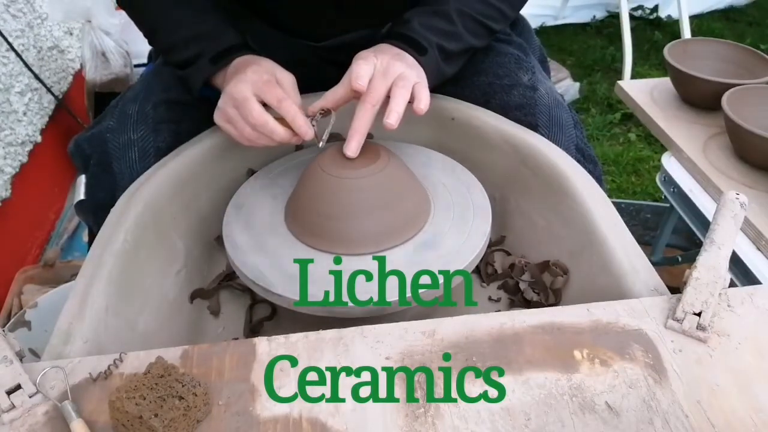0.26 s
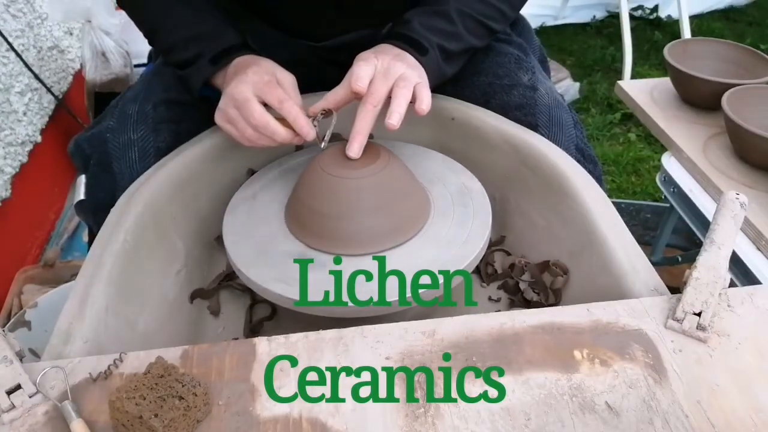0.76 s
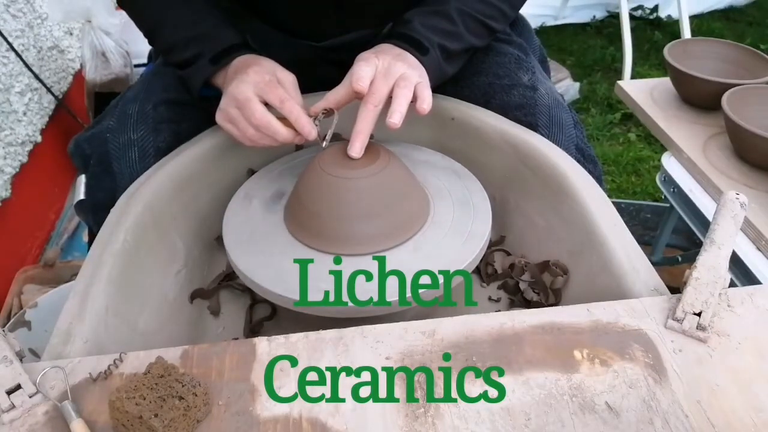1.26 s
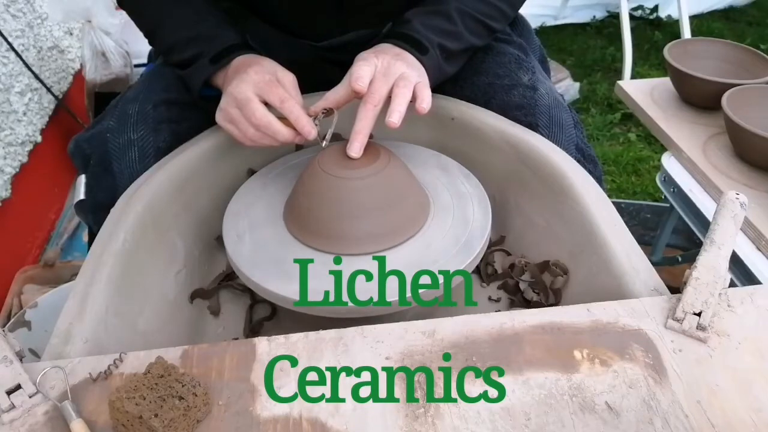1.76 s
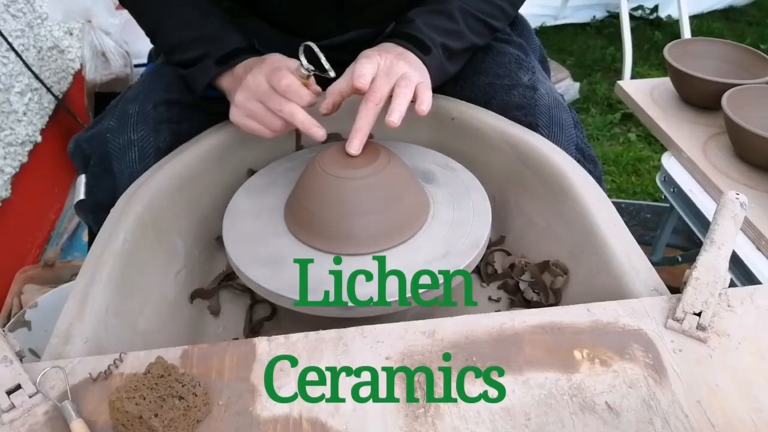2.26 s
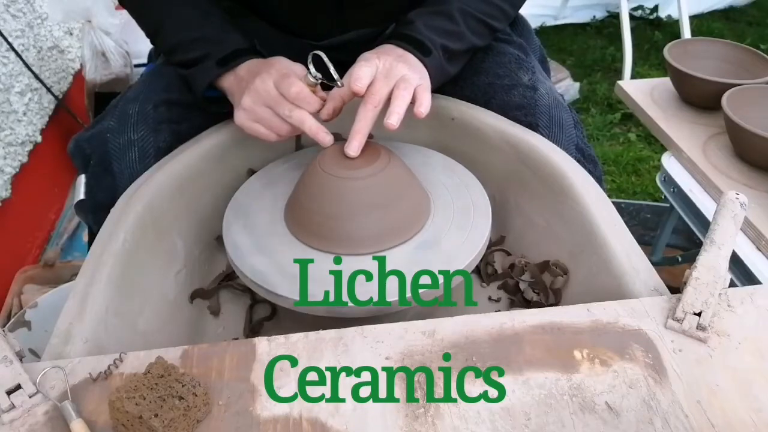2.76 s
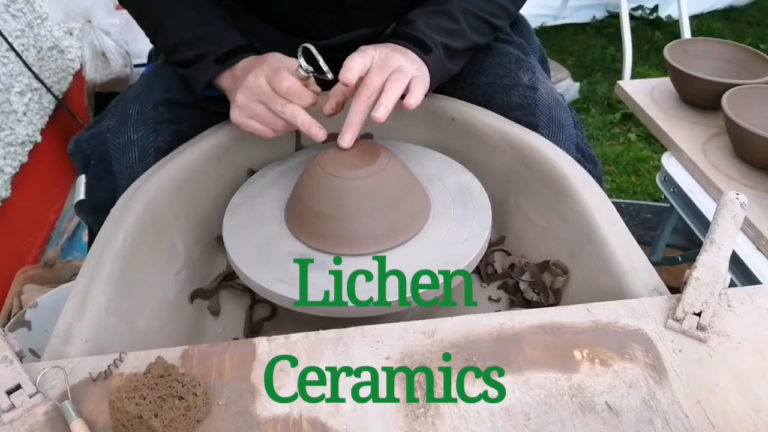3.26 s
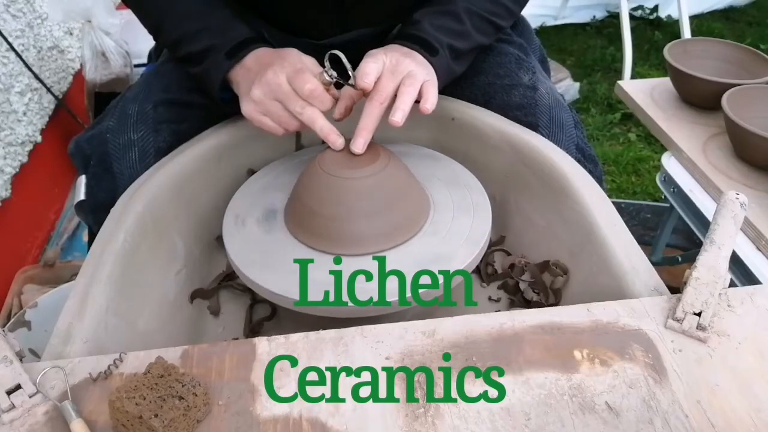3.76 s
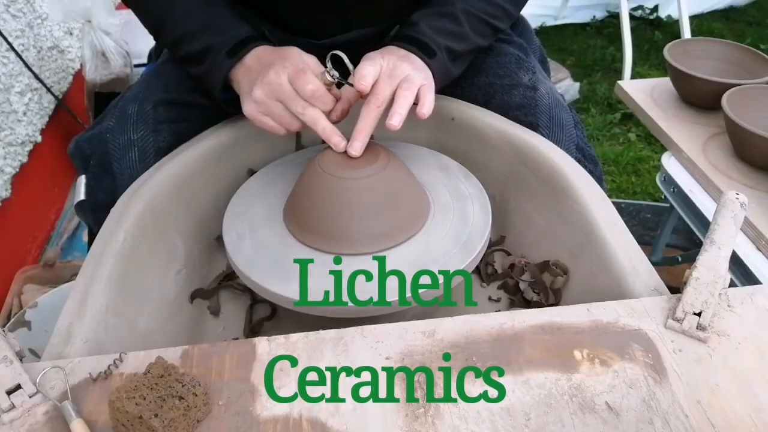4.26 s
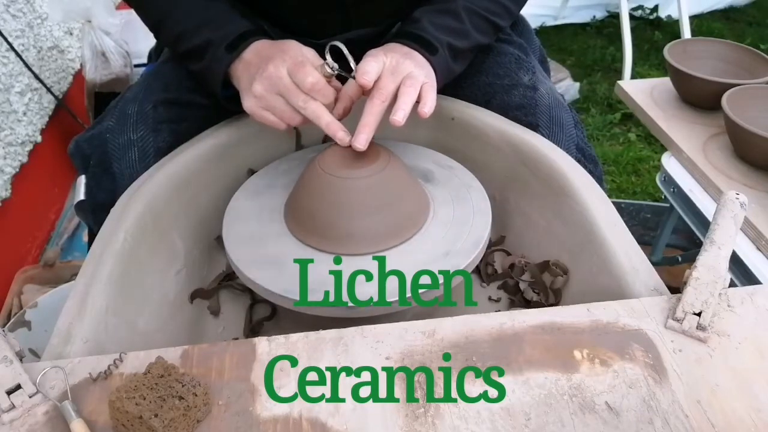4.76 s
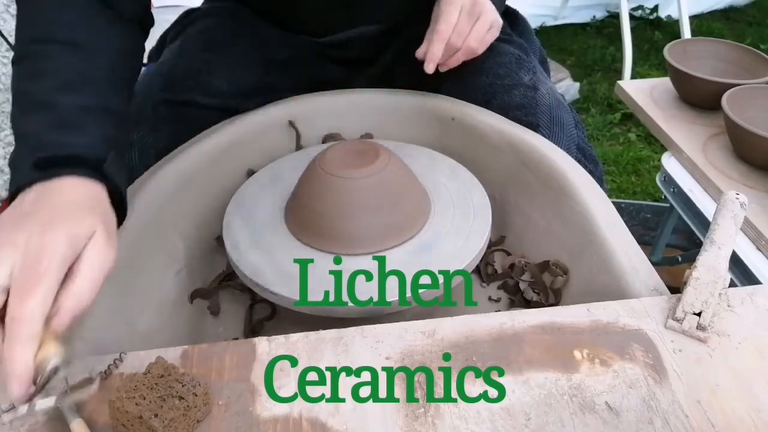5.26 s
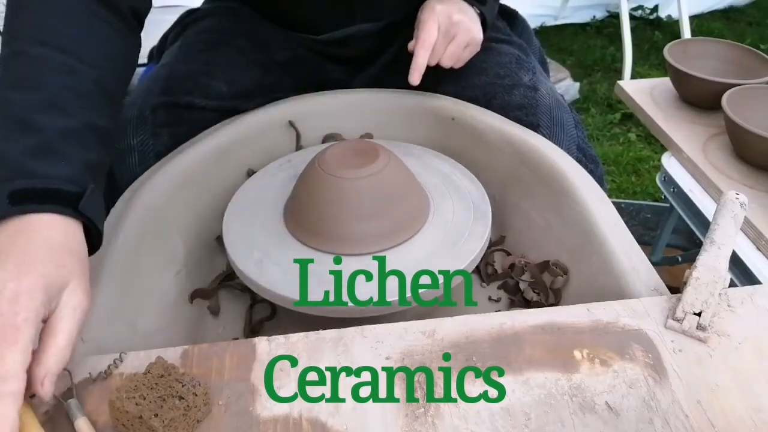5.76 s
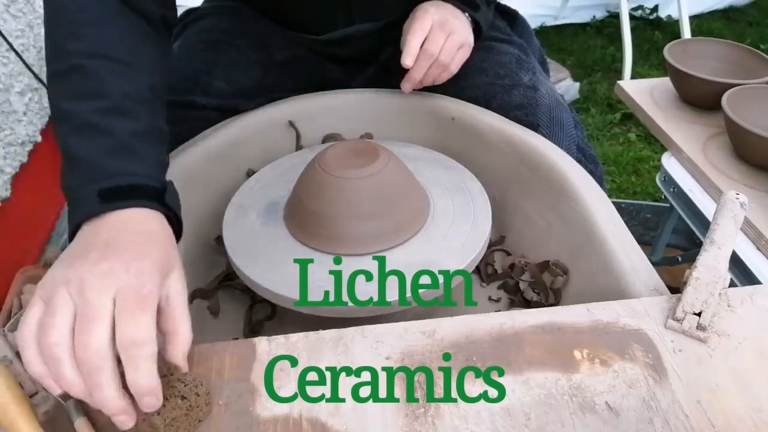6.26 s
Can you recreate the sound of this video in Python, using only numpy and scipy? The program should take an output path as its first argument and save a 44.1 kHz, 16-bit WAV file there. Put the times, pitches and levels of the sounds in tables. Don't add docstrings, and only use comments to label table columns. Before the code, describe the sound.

An electric pottery wheel drones with a low, fast-pulsing hum while a distant bird twitters, then it slows, stops, and tools knock on wood.

```python
import sys
import numpy as np
from scipy import signal
from scipy.fft import rfft, irfft, next_fast_len
from scipy.io import wavfile
from scipy.ndimage import uniform_filter1d, map_coordinates

SR = 44100
rng = np.random.default_rng(int(sys.argv[2]) if len(sys.argv) > 2 else 0)


def dump(signal):
    limited = np.clip(np.atleast_2d(signal).T, -1, 1)
    pcm = np.round(limited * 32767).astype(np.int16)
    wavfile.write(sys.argv[1], SR, pcm)


def volts_from_db(level):
    exponent = np.asarray(level, float) / 20
    return 10 ** exponent


N = 287091
T = np.arange(N) / SR
PRESS_S, PRESS_WIDE_S, PRESS_DB = 1.69, 0.13, 2


def along(points, hz):
    f, v = np.transpose(points)
    return np.interp(np.log(hz + 1), np.log(f + 1), v)


def curves(rows):
    s, *cols = np.transpose(rows)
    return [np.interp(T, s, c) for c in cols]


def wobble(rate):
    return map_coordinates(rng.standard_normal(int(N * rate / SR) + 4), [T * rate])


def bump(s, wide):
    return np.exp(-((T - s) / wide) ** 2)


def filtered(x, response):
    m = next_fast_len(N + SR)
    return irfft(rfft(x, m) * response(np.fft.rfftfreq(m, 1 / SR)), m)[..., :N]


def sides(db):
    return volts_from_db([[db / 2], [-db / 2]])


# (frequency [Hz], likeness [0-1])
EAR_LIKENESS = [(30, 0.57), (150, 1), (500, 0.55), (1000, 0.067), (4000, 0.054)]


def rush(spectrum, lo_hz, hi_hz, patchy_db):
    z = signal.stft(rng.standard_normal((2, N)), nperseg=512)[2]
    patches = uniform_filter1d(rng.standard_normal(z.shape[1:]), 6, 0)
    patches = uniform_filter1d(patches, 10, 1)
    pair = signal.istft(z * volts_from_db(patchy_db * patches / patches.std()), nperseg=512)[1][:, :N]

    def mid_side(hz):
        turn = np.arccos(np.clip(along(EAR_LIKENESS, hz), -1, 1)) / 2
        return volts_from_db(along(spectrum, hz)) * [np.cos(turn), np.sin(turn)]

    mid, side = filtered(pair, mid_side)
    in_band = filtered(mid, lambda hz: (hz > lo_hz) & (hz < hi_hz))
    return np.array([mid + side, mid - side]) / in_band.std()


# (frequency [Hz], fade time [s])
ECHO_FADE = [(2000, 0.11), (3300, 0.64), (4500, 0.38), (6000, 0.39), (10000, 0.31), (15000, 0.17)]


def echoes(x):
    hz, t, z = signal.stft(rng.standard_normal((2, SR)), SR, nperseg=256)
    fade = volts_from_db(-60 * t / along(ECHO_FADE, hz)[:, None])
    tail = signal.istft(z * fade, SR, nperseg=256)[1]
    return signal.fftconvolve(x[None], tail / np.linalg.norm(tail[0]), axes=1)[:, :N]


def lumps(pattern, turns, hz, scatter_db):
    push = np.zeros(N)
    for place, db in pattern:
        passing = np.flatnonzero(np.diff(np.floor(turns - place)))
        scatter = scatter_db * rng.standard_normal(len(passing))
        push[passing] += volts_from_db(db + scatter) * SR / (2 * hz)
    return push


BELT_HZ, SHAFT_HZ = 5.3829, 24.8967
COAST_S = 5.3
WHIRR_DB = -56
# (place in the turn [0-1], force [dB])
BELT_LUMPS = [(.13, -46.1), (.211, -44.9), (.265, -53.3), (.333, -50.6), (.597, -56), (.633, -49.1),
              (.689, -49.5)]
# (place in the turn [0-1], force [dB])
SHAFT_LUMPS = [(.454, -43.7), (.852, -42.9)]
# (frequency [Hz], width [Hz], level [dB])
FRAME_MODES = [(138.6, 6, -19), (150.1, 6, 2.3), (158.8, 16, -9.2), (201.2, 10, -15.5), (237, 6, -15),
               (64, 3.6, -28.5), (107.3, 31, -30), (267, 4.7, -48.5), (300.4, 18, -30.5),
                    (422.6, 13.4, -30.5)]
# (time [s], speed [0-1], force [dB])
SLOWING = [
    (5.501, 0.98, 3.5),
    (5.702, 0.93, -13.5),
    (5.9, 0.62, -7.5),
    (6.05, 0.7, -3.5),
    (6.159, 0, -37),
    (6.51, 0, -20),
]
# (frequency [Hz], level [dB per Hz])
BEARING_COLOUR = [(20, -38), (45, -27), (65, -1), (150, 12.5), (230, 5.5), (340, -5), (420, 1.5), (470, -5),
                  (530, 5.5), (700, -4.5), (830, -7.5), (1000, -6), (1200, -17), (2200, -97)]


def wheel():
    speed, force_db = curves([(COAST_S, 1, 0)] + SLOWING)
    clock = np.cumsum(speed) / SR
    push = lumps(BELT_LUMPS, clock * BELT_HZ, BELT_HZ, scatter_db=0.7)
    push += lumps(SHAFT_LUMPS, clock * SHAFT_HZ, SHAFT_HZ, scatter_db=0.7)

    def ring(f):
        total = 0
        for k, (centre, width, db) in enumerate(FRAME_MODES):
            drag = 1j * f * width
            total = total + (-1) ** k * volts_from_db(db) * drag / (centre * centre - f * f + drag)
        return total * (f < 480)

    drone = filtered(push * volts_from_db(force_db - 0.93), ring) * sides(3.56)

    knead_db = 0.75 * speed * np.cos(4 * np.pi * (clock * BELT_HZ - 0.2)) + 0.5 * wobble(3.82)
    whirr = rush(BEARING_COLOUR, lo_hz=330, hi_hz=1200, patchy_db=1.18)
    resting = filtered(whirr, lambda f: 1 - 0.9 * (f < 280))
    whirr = resting + volts_from_db(force_db) * (whirr - resting)
    press_db = PRESS_DB * bump(PRESS_S, PRESS_WIDE_S)
    return drone + volts_from_db(WHIRR_DB + press_db + knead_db - 0.74) * whirr * sides(1.2)


MAINS_HZ = 99.95
MAINS_DB, MAINS_STALLED_DB = -60.5, -55.5
PEDAL_S, PEDAL_DB = 5.9, -10
# (multiple of MAINS_HZ, running [dB], stalled [dB], left over right [dB])
WINDING_BUZZ = [(2, -107.5, -77, -22), (3, -65, -64, 3), (4, -71, -79, -3.5), (5, -76, -65.5, -6),
                (6, -76, -71, 1), (7, -72.5, -70.5, -11.5), (8, -83, -72, 14), (9, -79.5, -69, 7),
                (10, -74, -76.5, 10.5)]
# (frequency [Hz], running [dB], stalled [dB])
SLOT_WHINE = [(1021, -76, -69), (1095.5, -76, -77), (996, -77, -72), (524, -70, -72)]


def motor():
    stall = np.interp(T, [5.95, 6.15], [0, 1])

    def tone(hz, running_db, stalled_db, dip_db=0):
        db = running_db + (stalled_db - running_db) * stall + dip_db
        return np.sqrt(2) * volts_from_db(db + 1.9 * wobble(6)) * np.sin(2 * np.pi * (hz * T + rng.random()))

    hum = tone(MAINS_HZ, MAINS_DB, MAINS_STALLED_DB, PEDAL_DB * bump(PEDAL_S, 0.17))
    buzz = sum(tone(k * MAINS_HZ, run, rest) * sides(pan) for k, run, rest, pan in WINDING_BUZZ)
    whine = sum(tone(hz, run, rest) for hz, run, rest in SLOT_WHINE)
    return hum * sides(7.4) + buzz + whine * sides(6.8)


BOARD_UPPER, BOARD_CYCLES = 1.8, 34.4
TINK_T60_S, RATTLE_DB = 0.065, -5.5
# (time [s], peak level [dB], pitch of the spot [Hz], hardness [dB])
BOARD_THUMPS = [(5.453, -26, 208, -5.5), (5.479, -38.5, 307, 0.5), (5.514, -30, 233.5, -13),
                (5.609, -37, 193, -18), (5.843, -33, 247, -8), (5.875, -36.5, 160.6, -7),
                (6.346, -33, 233.6, -13), (6.35, -41, 150, -23), (5.56, -53, 53.6, -15),
                (5.875, -52, 63.3, -12)]
# (frequency [Hz], level [dB], fade time [s])
HANDLE_MODES = [(606, -2.5, 0.064), (677, 1, 0.053), (797, -3.5, 0.048), (1490, -19, 0.035)]
# (time [s], peak level [dB], left over right [dB])
HANDLE_TAPS = [
    (5.612, -45, 4),
    (5.739, -37, 9),
    (5.838, -31, 10.5),
    (5.848, -33, 12),
]
# (time [s], peak level [dB], pitch [Hz])
LOOP_TINKS = [
    (5.325, -44.5, 1606),
    (5.462, -48.5, 1023),
    (5.739, -51, 1550),
]
# (frequency [Hz], level [dB per Hz])
RATTLE_COLOUR = [(400, -17), (1000, 4), (1550, -10), (1900, -1.5), (2700, 0.5), (3200, -4.5), (3700, -15.5),
                 (7000, -13), (9000, -28), (15000, -22)]


def board():
    wood, loose = np.zeros((2, N + SR)), np.zeros((2, N + SR))
    t = T[:SR // 3]
    rings, rattles = [], []
    for s, db, hz, hard in BOARD_THUMPS:
        for k in range(2):
            pitch = hz * BOARD_UPPER ** k
            rings.append((s, db + k * hard, pitch, BOARD_CYCLES / pitch, 1.5))
        rattles.append((s, db + hard - 6))
    for s, db, pan in HANDLE_TAPS:
        rings += [(s, db + level, hz, t60, pan) for hz, level, t60 in HANDLE_MODES]
        rattles.append((s, db - 0.5 + 0.4 * (db + 32)))
    for s, db, hz in LOOP_TINKS:
        rings.append((s, db, hz, TINK_T60_S, 0))
        rattles.append((s, db + 3))

    for s, db, hz, t60, pan in rings:
        phase = 2 * np.pi * rng.random((2, 1))
        neighbours = np.sin(2 * np.pi * hz * np.array([[0.84], [1.19]]) * t + phase).sum(0)
        ring = np.sin(2 * np.pi * hz * t) + min(0.3, 200 / hz) * neighbours
        onset = 1 - np.exp(-t * hz * (0.45 + hz / 600))
        wood[:, round(s * SR):][:, :len(t)] += volts_from_db(db - 60 * t / t60) * ring * onset * sides(pan)

    fading = volts_from_db(-60 * t / 0.0033) + 1.05 * volts_from_db(-60 * t / 0.23)
    for s, db in rattles:
        noise = rng.standard_normal((2, len(t)))
        loose[:, round(s * SR):][:, :len(t)] += volts_from_db(db + RATTLE_DB) * fading * noise * sides(3.9)
    hits = wood[:, :N] + filtered(loose[:, :N], lambda hz: volts_from_db(along(RATTLE_COLOUR, hz)))
    return hits + volts_from_db(-7) * echoes(hits.mean(0))


SLEEVE_RISE, SLEEVE_FALL, SLEEVE_REST_DB = 135, 55, -94.5
# (time [s], hold [s], level [dB])
SLEEVE_MOVES = [
    (0, 0.17, -82.5),
    (2.303, .02, -92),
    (3.6, 0.37, -80),
    (5.2, 0.057, -76),
    (5.3, .2, -67),
    (6.003, 0.19, -83.5),
]
# (time [s], peak level [dB])
CRUMBS = [(0.5302, -71), (1.1697, -71), (1.3698, -75), (1.5094, -71), (2.1094, -66), (2.1544, -77),
          (2.3106, -67), (2.6294, -70), (2.7601, -75), (2.8394, -67), (3.3994, -66)]
# (frequency [Hz], level [dB per Hz])
CLOTH_COLOUR = [(1200, -21), (2000, -8.5), (3300, -14), (4400, -9.5), (6800, 1), (8050, -8), (11600, -15.5),
                (15100, -9.5), (16000, -29)]


def potter():
    rustle = volts_from_db(SLEEVE_REST_DB)
    for s, hold, db in SLEEVE_MOVES:
        before, after = np.maximum(s - T, 0), np.maximum(T - s - hold, 0)
        rustle = rustle + volts_from_db(db - SLEEVE_RISE * before - SLEEVE_FALL * after)
    rustle = rustle * volts_from_db(0.63 * wobble(40))
    for s, db in CRUMBS:
        rustle[round(s * SR):][:1500] += volts_from_db(db - 11 - 60 * T[:1500] / 0.1)
    return rustle * rush(CLOTH_COLOUR, lo_hz=10100, hi_hz=14150, patchy_db=1.3) * sides(2.4)


WARBLE_HZ = 188.9


def whistle(s, length, hz0, hz1, db, warble_hz, rise):
    t = T[:int(length * SR)]
    uneven = wobble(WARBLE_HZ)[:len(t)]
    quaver = 1.04 * np.sin(2 * np.pi * WARBLE_HZ * t + 1.11 * uneven) + 0.593 * uneven
    pitch = hz0 + (hz1 - hz0) * t / length + warble_hz * quaver
    edges = np.minimum(1, np.minimum(t / rise, (length - t) / (rise / 4)))
    shape = edges * volts_from_db(warble_hz / 90 * uneven[::-1])
    out = np.zeros(N)
    out[round(s * SR):][:len(t)] = volts_from_db(db) * shape * np.sin(2 * np.pi * np.cumsum(pitch) / SR)
    return out


SAG_HZ_PER_S, SLUR_HZ_PER_S, BUZZ_HZ_PER_S, PIP_HZ = 1190, 8700, 660, 3920
HELD_WARBLE_HZ, SLUR_WARBLE_HZ, BUZZ_WARBLE_HZ, PIP_WARBLE_HZ = 71, 151, 223, 51
DIVE_S, DIVE_TO_HZ, ROLL_WARBLE_HZ = 0.046, 2960, 110
CLIMB_S, CLIMB_FROM_HZ, CLIMB_TO_HZ, CLIMB_DB = 0.105, 3130, 3380, -1.5
# (time [s], length [s], pitch [Hz], level [dB])
HELD_NOTES = [(3.055, 0.025, 7250, -71), (3.111, 0.065, 7110, -61.5), (3.34, 0.082, 5230, -72),
              (3.422, 0.05, 5790, -63.5), (3.49, 0.04, 6860, -49), (3.546, 0.064, 5640, -58.5),
              (3.628, 0.088, 4800, -64), (3.735, 0.024, 3890, -56.5), (3.822, .065, 2930, -62),
              (3.829, 0.14, 9920, -76), (3.909, 0.087, 3233, -53.5), (4.005, 0.12, 2690, -67.5),
              (4.264, 0.026, 5120, -72), (4.983, 0.098, 4020, -70)]
# (time [s], length [s], pitch [Hz], level [dB])
QUICK_SLURS = [(3.215, .045, 6840, -61.5), (3.238, 0.05, 6270, -68), (3.462, .033, 7250, -56),
               (3.601, 0.27, 6350, -68), (3.648, 0.054, 5540, -63.5), (3.703, 0.047, 4120, -60),
               (3.795, 0.022, 3180, -56), (4.039, 0.019, 7350, -66)]
# (time [s], length [s], pitch [Hz], level [dB])
HIGH_BUZZES = [
    (4.345, 0.144, 7490, -60.5),
    (4.511, 0.089, 7660, -56),
    (4.69, 0.12, 7610, -56),
]
# (time [s], length [s], level [dB])
CLOSING_PIPS = [
    (4.845, 0.085, -68),
    (5.06, 0.016, -56.5),
    (5.103, .02, -63),
    (5.15, 0.13, -74),
    (5.27, 0.046, -71),
]
# (time [s], pitch dived from [Hz], level [dB])
CLOSING_ROLLS = [
    (4.869, 3590, -59),
    (5.066, 3380, -58),
    (5.25, 3270, -68),
]


def song():
    pips = [(s, length, PIP_HZ, db) for s, length, db in CLOSING_PIPS]
    kinds = [(HELD_NOTES, SAG_HZ_PER_S, HELD_WARBLE_HZ), (QUICK_SLURS, SLUR_HZ_PER_S, SLUR_WARBLE_HZ),
             (HIGH_BUZZES, BUZZ_HZ_PER_S, BUZZ_WARBLE_HZ), (pips, SAG_HZ_PER_S, PIP_WARBLE_HZ)]
    notes = []
    for rows, fall, warble in kinds:
        notes += [(s, length, hz, hz - fall * length, db, warble) for s, length, hz, db in rows]
    for s, hz, db in CLOSING_ROLLS:
        notes.append((s, DIVE_S, hz, DIVE_TO_HZ, db, ROLL_WARBLE_HZ))
        climb_s = s + DIVE_S + 0.008
        notes.append((climb_s, CLIMB_S, CLIMB_FROM_HZ, CLIMB_TO_HZ, db + CLIMB_DB, ROLL_WARBLE_HZ))
    return sum(whistle(*note, rise=0.0023) for note in notes)


# (frequency [Hz], left over right [dB])
SINGER_SIDE = [(3000, 3), (5600, 4.5), (6900, 7), (7500, -3), (10000, -14)]


def songbird():
    direct = song()
    near = echoes(direct)
    late = echoes(near.mean(0))
    heard = volts_from_db(-0.5) * direct + volts_from_db(7.5) * near + volts_from_db(-0.5) * late
    return filtered(heard, lambda hz: volts_from_db([along(SINGER_SIDE, hz) / 2, -along(SINGER_SIDE, hz) / 2]))


# (time [s], length [s], start pitch [Hz], end pitch [Hz], level [dB])
CHIRP = (6.3437, .0052, 5450, 5850, -20.3)
# (frequency [Hz], level [dB per Hz])
SNAP_COLOUR = [(1500, -16), (2300, -19), (2640, -2), (2900, -14), (3600, -17), (4200, -21), (5000, -1),
               (5900, 0.5), (7300, -6), (10300, -19.5), (12000, -35), (14500, -14), (16000, -27)]


def chip():
    chirp = whistle(*CHIRP, 0, rise=0.0032)
    snap = np.zeros(N)
    snap[round((CHIRP[0] + 0.002) * SR)] = volts_from_db(8.0)
    snap = filtered(snap, lambda hz: volts_from_db(along(SNAP_COLOUR, hz))) * (T > CHIRP[0])
    direct = chirp * sides(10.5) + volts_from_db(-14) * snap * sides(2.2)
    return direct + echoes(volts_from_db(-10) * chirp + snap) * sides(2.2)


# (frequency [Hz], level [dB per Hz])
AIR_COLOUR = [(700, -21), (1000, -12.5), (1200, -10), (1350, -4), (1620, -11), (2020, -7), (2430, -12),
              (3240, -14.5), (4270, -20.5), (5500, -15), (7300, -13.5), (8900, -28.5), (12500, -30.5),
              (14800, -28)]
# (frequency [Hz], level [dB per Hz])
RUMBLE_COLOUR = [(15, -9), (25, 2.5), (40, -19), (60, 1.5), (90, -17), (130, -60)]


def garden():
    hiss_db = -69.0 + 0.11 * wobble(3.28) + 0.5 * PRESS_DB * bump(PRESS_S, PRESS_WIDE_S)
    hiss = volts_from_db(hiss_db) * rush(AIR_COLOUR, lo_hz=1306, hi_hz=2450, patchy_db=1.2)
    rumble = volts_from_db(-77.0) * rush(RUMBLE_COLOUR, lo_hz=18, hi_hz=45, patchy_db=0.5)
    return (hiss + rumble) * sides(1.85)


def scene():
    return wheel() + motor() + board() + potter() + songbird() + chip() + garden()


def roll_off(x):
    return signal.sosfilt(signal.butter(12, 16520, fs=SR, output="sos"), x)


def record(dry):
    mix = filtered(dry, lambda hz: np.exp(1j * np.pi * hz * [[-0.00011], [0.00011]]) * (hz < 15750))
    return roll_off(mix)


dry = scene()
out = record(dry)
dump(out)
```